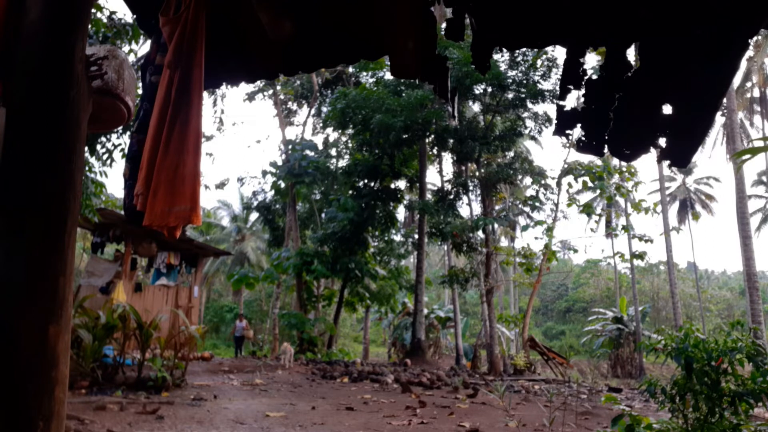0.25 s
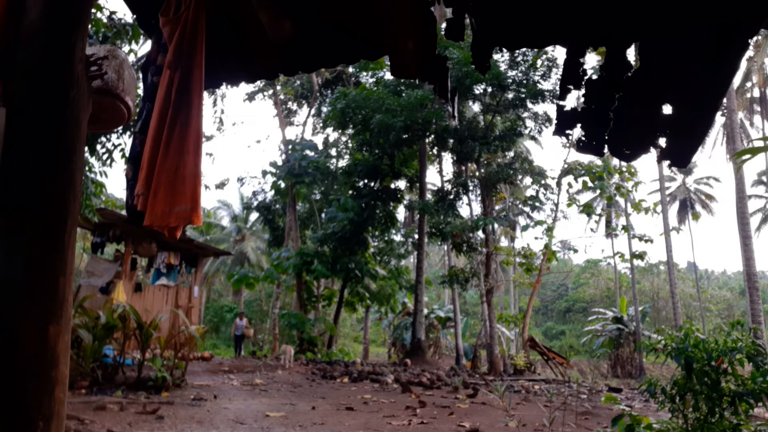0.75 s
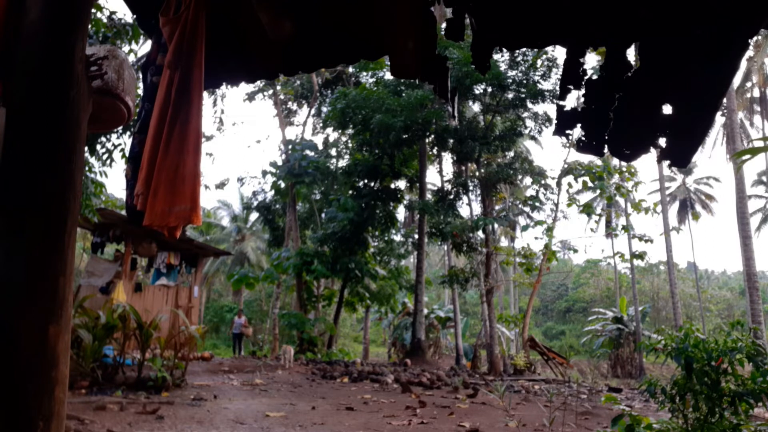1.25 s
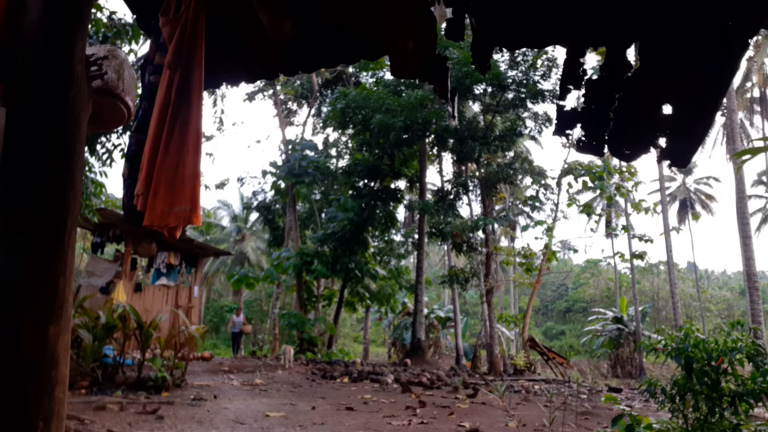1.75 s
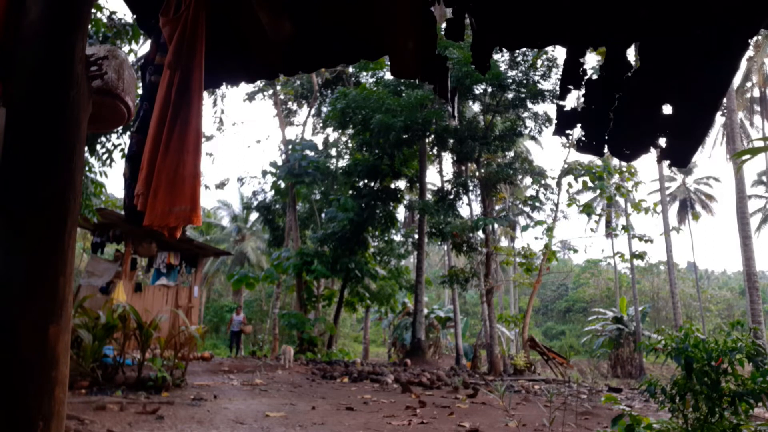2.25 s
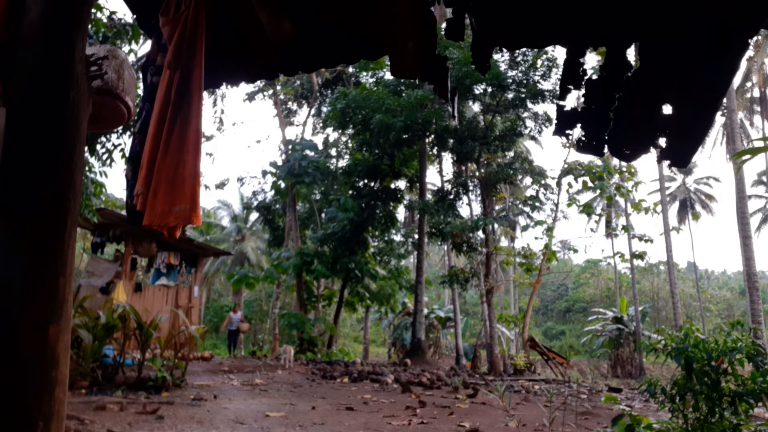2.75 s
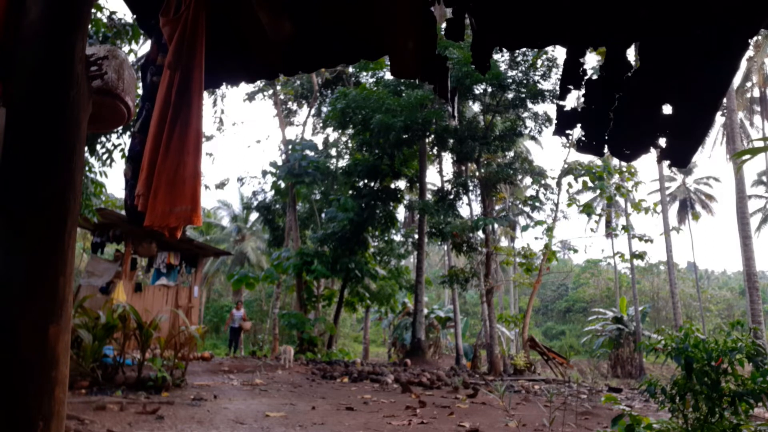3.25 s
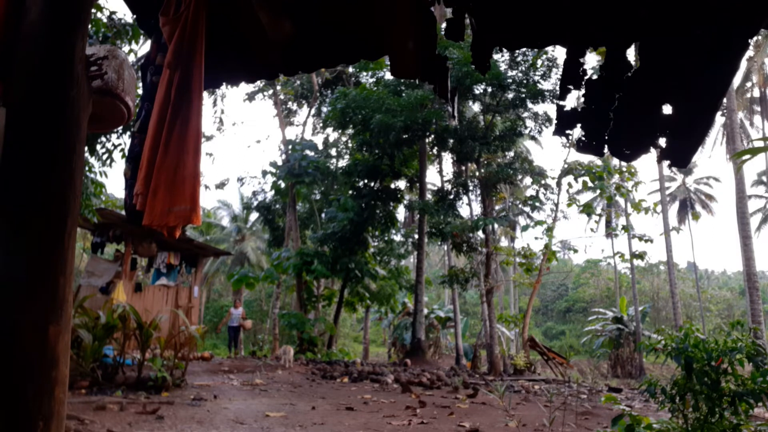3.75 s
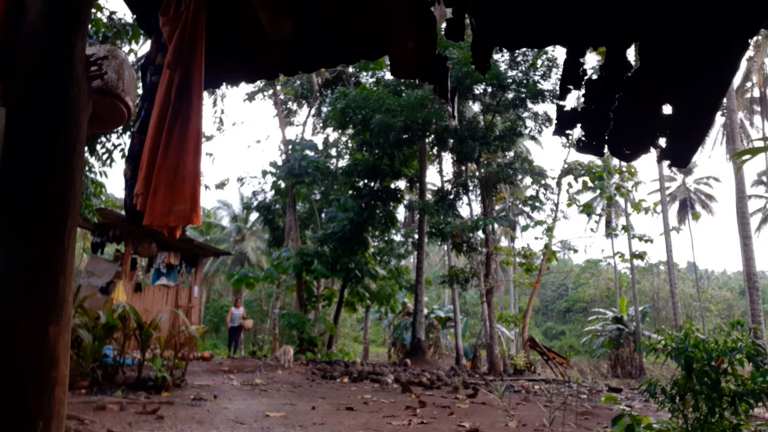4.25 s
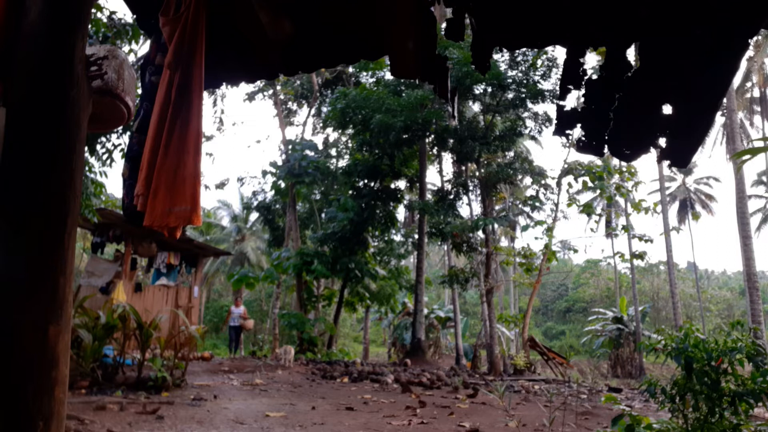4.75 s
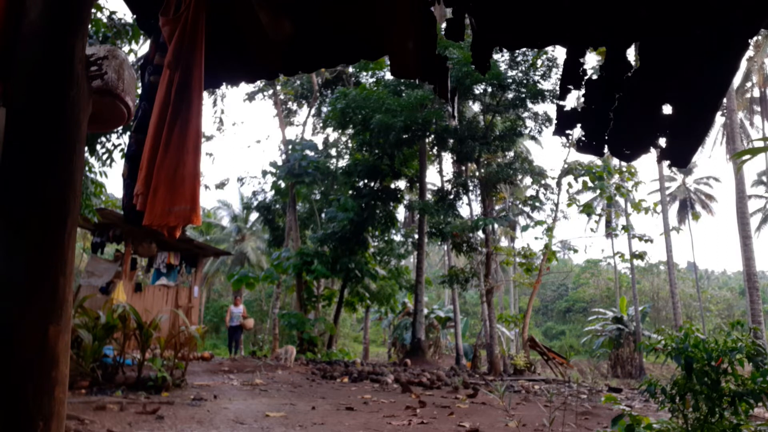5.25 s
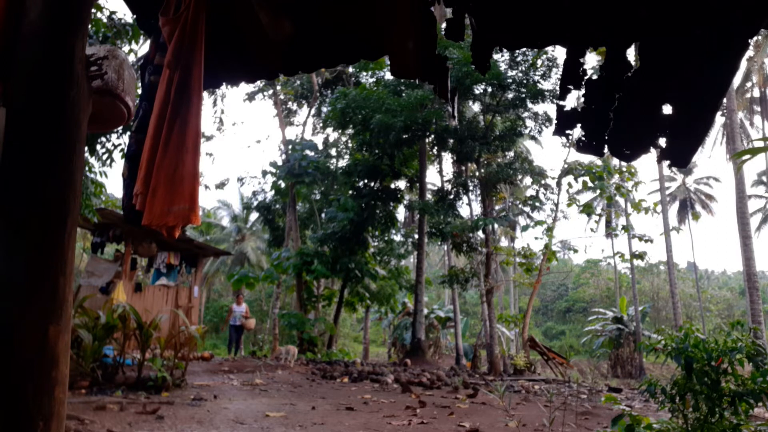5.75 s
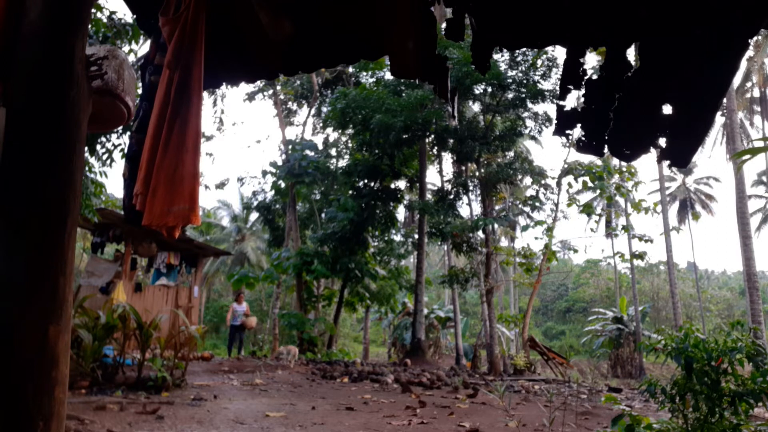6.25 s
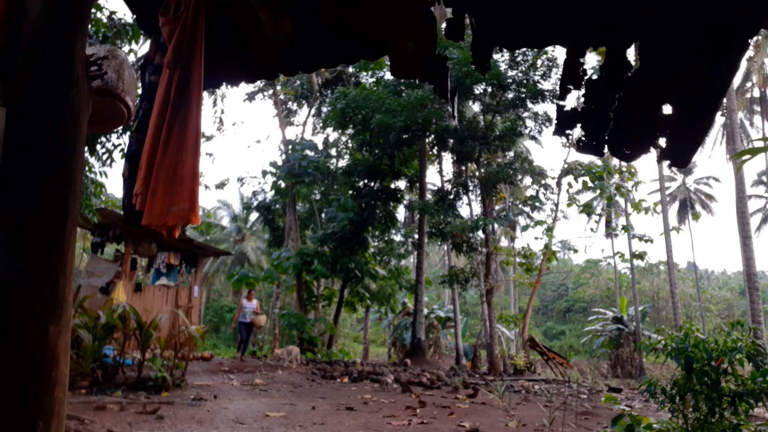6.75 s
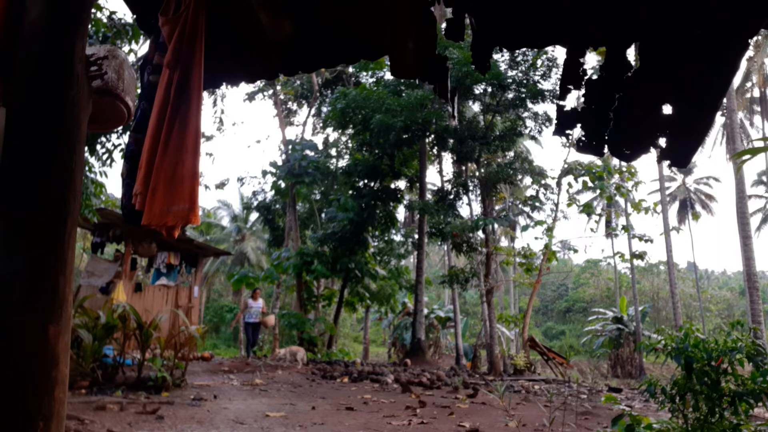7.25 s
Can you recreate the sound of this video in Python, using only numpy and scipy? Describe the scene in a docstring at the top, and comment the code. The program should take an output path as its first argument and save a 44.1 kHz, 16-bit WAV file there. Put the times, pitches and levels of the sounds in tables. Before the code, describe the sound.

In a quiet tree-lined farmyard, a hen clucks in a quick regular run and squawks once loudly, while birds whistle and trill farther off.

```python
"""Hen in a farmyard, from the porch

A stereo microphone under a porch roof, in a farmyard among trees. Close by, a hen clucks four or five
times a second (rough harmonics through throat resonances) and sets something hollow ringing; a few low
clucks lead to one loud squawk and a last cluck, and the ground is scuffed now and then. Further off, small
birds whistle, chip and trill (gliding sines), over coloured noise: low air, leaves, insect hiss, rustles."""
import sys
import numpy as np
from scipy import signal
from scipy.fft import rfft, irfft
from scipy.io import wavfile

SR = 44100
rng = np.random.default_rng(int(sys.argv[2]) if len(sys.argv) > 2 else 0)


def materialize(psi):
    """Save the field psi as 16-bit PCM at rate SR to the path in sys.argv[1].

    A 1-D psi becomes a single channel; in a 2-D psi each row is a channel.
    """
    bounded = np.clip(np.atleast_2d(psi).T, -1, 1)
    quanta = np.round(bounded * 32767).astype(np.int16)
    wavfile.write(sys.argv[1], SR, quanta)


N = 330750
TIME = np.arange(N) / SR


def from_db(db):
    """Amplitude factor of a level in dB."""
    return 10 ** (np.asarray(db) / 20)


def rms_one(x):
    """The same signal scaled to rms 1."""
    return x / np.sqrt(np.mean(x ** 2) + 1e-20)


def columns(rows, at):
    """Every column of a table after the first, joined by straight lines."""
    first, *rest = np.transpose(rows)
    return [np.interp(at, first, column) for column in rest]


def at_hz(points, hz):
    """A spectrum read on a log-frequency axis."""
    point_hz, values = np.array(points).T[:2]
    return np.interp(np.log(hz + 1), np.log(point_hz), values)


def wobble(rate_hz):
    """Random motion up to about the given rate; rms 1."""
    lowpass = signal.butter(2, rate_hz, fs=SR, output="sos")
    return rms_one(signal.sosfilt(lowpass, rng.standard_normal(N)))


def delayed(x, ms):
    """The same sound a little later."""
    return np.interp(TIME - ms / 1000, TIME, x, 0)


def pan(x, left_db):
    """Level difference between the two sides."""
    return x * from_db([[left_db / 2], [-left_db / 2]])


def place(x, lead_ms, left_db):
    """A source off to one side: a positive lead reaches the left microphone first."""
    return pan(np.array([x, delayed(x, lead_ms)]), left_db)


# how alike diffuse sound is at the two microphones: f/Hz, left-right correlation
LIKENESS = [(60, 0.98), (250, 0.92), (600, 0.67), (1200, 0), (15000, 0.0061)]


def diffuse(spectrum):
    """Stereo noise of a given colour from all round, most alike on both sides in the bass; rms 1."""
    hz = np.arange(N // 2 + 1) * SR / N
    mid, side = rfft(rng.standard_normal((2, N))) * from_db(at_hz(spectrum, hz))
    alike = np.clip(at_hz(LIKENESS, hz), -1, 1)
    spectra = np.sqrt(1 + alike) * mid + np.sqrt(1 - alike) * side * [[1], [-1]]
    return rms_one(irfft(spectra, N))


# single reflections from roof and walls: delay t/ms, level/dB, left lead t/ms
ECHOES = [(7.107, -26, 0.49), (11.44, -16.5, -0.51), (23.97, -8.5, 0.33), (62, -18.5, -.2)]


def yard(x, near_db, near_t60, far_db, far_t60):
    """Reflections from roof and walls, a quick scatter, then a faint long echo from the trees."""
    t = TIME[:SR]
    tail = 0
    for level_db, t60 in ((near_db, near_t60), (far_db, far_t60)):
        scatter = rng.standard_normal((2, SR)) * from_db(-60 * t / t60) * (t > .012)
        tail = tail + from_db(level_db) * scatter / np.sqrt(np.sum(scatter ** 2) / 2)
    echoes = sum(from_db(db) * place(delayed(x, ms), lead, 0) for ms, db, lead in ECHOES)
    return echoes + signal.fftconvolve(x[None], tail, axes=1)[:, :N]


# colours of low air, leaves, insect hiss and dry rustles: f/Hz, relative level/dB per Hz
AIR = [(25, -39), (50, -6), (75, 0.5), (130, -3), (200, -6), (300, -12.5), (550, -20.5), (1200, -39),
       (4000, -70)]
LEAVES = [(100, -20), (350, -4), (550, 0.5), (830, -0.5), (1250, -4.5), (1600, -3), (2400, -4.5),
          (3250, -2), (4100, -7), (5500, -10.5), (7200, -59)]
HISS = [(4500, -24.5), (5600, -11), (6300, -8.5), (7000, 2), (7600, 1.5), (8100, -9), (8650, -31),
        (9200, -13.5), (10300, -1.5), (11200, -12.5), (12000, -26), (15500, -20)]
RUSTLE_COLOUR = [(1500, -6), (5000, 5), (8000, 3), (8700, -20), (10000, 4), (15000, 1)]
# faint dry rustles: peak t/s, half length t/s (to 1/e), level/dB
RUSTLES = [(.28, 0.25, -59), (1.33, .04, -66), (3.16, 0.055, -66), (3.999, .14, -59.5), (5.441, 0.052, -55)]
AIR_DB, LEAVES_DB, HISS_DB = -55, -57, -55


def background():
    """Unsteady low air, a smooth wash of leaves, insect hiss and a few dry rustles."""
    air = from_db(AIR_DB + 1.07 * wobble(12)) * diffuse(AIR)
    leaves = from_db(LEAVES_DB) * diffuse(LEAVES)
    hiss = from_db(HISS_DB) * diffuse(HISS)
    swells = sum(from_db(db) * np.exp(-((TIME - s) / length) ** 2) for s, length, db in RUSTLES)
    rustles = swells * from_db(2.4 * wobble(90)) * diffuse(RUSTLE_COLOUR)
    return pan(air + leaves, left_db=-2.5) + pan(hiss + rustles, left_db=-1.5)


def whistles(rows, contour, length, waver):
    """Nearly pure notes (t/s, f/Hz, level/dB) whose pitch and level all follow one contour."""
    out = np.zeros(N)
    unsteady = 1 + waver * wobble(180)
    for s, hz, db in rows:
        on = (TIME > s) & (TIME < s + length)
        bend, shape_db = columns(contour, (TIME[on] - s) / length)
        phase = 2 * np.pi * np.cumsum(hz * bend * unsteady[on]) / SR
        out[on] += from_db(db + shape_db) * np.sin(phase)
    return out


# trills: start t/s, length t/s, relative level/dB
TRILLS = [(0.39, 0.53, -50.5), (3.17, 0.58, -47), (4.565, 0.40, -47)]
TRILL_HZ, TRILL_SWEEPS_PER_S = 3335, 33   # mean values; pitch and pace both vary


def trills(sweep_hz, rise_s, fall_s, unevenness, overtone_db):
    """A whistle swept widely up and down some thirty times a second makes a purring trill."""
    out = np.zeros(N)
    pace = 1 + unevenness * wobble(29.3)
    reach = sweep_hz * (1 + 0.0573 * wobble(29.2))
    for s, length, db in TRILLS:
        on = (TIME > s) & (TIME < s + length)
        age = TIME[on] - s
        sweep = reach[on] * np.sin(2 * np.pi * np.cumsum(TRILL_SWEEPS_PER_S * pace[on]) / SR)
        phase = 2 * np.pi * np.cumsum(TRILL_HZ + sweep) / SR
        shape = from_db(db) * np.tanh(age / rise_s) * np.tanh((length - age) / fall_s)
        out[on] += shape * (np.sin(phase) + from_db(overtone_db) * np.sin(2 * phase))
    return out


# contours of the bird notes: share of the note, ratio to the note's pitch, relative level/dB
SLUR_CONTOUR = [(0, .99, -20), (.17, 1.005, -2), (.45, .99, -9), (.62, .95, -5), (.74, .8, -9),
                (.85, .72, -1), (1, .64, -12)]
CHIP_CONTOUR = [(0, .83, -16), (.2, .96, -3), (.35, 1, 6), (.52, .96, -1), (.66, .8, 0), (1, .79, -9)]
PEEP_CONTOUR = [(0, .97, -20), (.25, 1, 4), (.65, 1, 5), (1, 1.05, -10)]
DIP_CONTOUR = [(0, 1.12, -14), (.25, 1, 4), (.55, .93, 3), (.8, .98, 1), (1, 1.12, -12)]
# long falling whistles: start t/s, relative level/dB
SLURS = [(.275, -52.5), (.81, -50), (1.80, -56), (2.275, -49), (2.82, -47), (3.59, -50), (6.41, -52),
         (6.775, -50), (7.365, -53)]
# short arched notes: start t/s, top pitch f/Hz, relative level/dB
CHIPS = [(4.352, 3850, -51), (4.458, 3930, -50), (4.527, 4100, -52), (5.323, 3880, -49.5),
         (5.428, 3920, -48), (5.528, 4100, -47), (5.66, 4100, -45.5), (6.44, 3550, -59),
         (6.68, 3880, -57.5), (7.09, 3600, -61), (7.27, 3750, -57)]
# nearly level notes: start t/s, pitch f/Hz, relative level/dB
PEEPS = [(.095, 3320, -48.5), (.865, 3400, -53), (1.123, 3310, -48.5), (3.985, 3240, -59),
         (5.23, 3150, -62), (5.81, 3130, -59)]
# notes that dip and rise again: start t/s, pitch f/Hz, relative level/dB
DIPS = [(.66, 3180, -44.5), (4.56, 3900, -50), (6.565, 3300, -57)]
# every kind of note has its own length; slurs also keep their pitch
SLUR_S, SLUR_HZ, CHIP_S, PEEP_S, DIP_S = .2, 4540, .073, .075, .066


def birds():
    """Small birds further off, so their songs come blurred by the trees."""
    slurs = [(s, SLUR_HZ, db) for s, db in SLURS]
    song = whistles(slurs, SLUR_CONTOUR, SLUR_S, waver=0.0098)
    song = song + whistles(PEEPS, PEEP_CONTOUR, PEEP_S, waver=0.0068)
    song = song + whistles(CHIPS, CHIP_CONTOUR, CHIP_S, waver=0.0094)
    song = song + whistles(DIPS, DIP_CONTOUR, DIP_S, waver=0.0048)
    purr = trills(sweep_hz=615, rise_s=0.07, fall_s=0.012, unevenness=.12, overtone_db=-13)
    purr = from_db(2.3 * wobble(17)) * purr
    # the triller sits deep in the foliage: its sweeps arrive several times over and overlap
    song = song + from_db(-4) * (purr + delayed(purr, 9.3) + from_db(-6) * delayed(purr, 20.5))
    direct = place(song, lead_ms=0.062, left_db=-4.0)
    blur = yard(song, near_db=1, near_t60=0.082, far_db=-9.5, far_t60=0.34)
    return from_db(-2.5) * (direct + blur)


# scuffs on the ground: start t/s, relative level/dB, decay t/s (to 1/e), dull rumble's relative level/dB
SCUFFS = [(.745, -43, 0.058, -52), (2.655, -38, .035, -53.5), (3.699, -33, 0.039, -44.5)]
# colours of the grit and of the rumble: f/Hz, relative level/dB per Hz
SCUFF_COLOUR = [(59, -45), (100, -19.5), (345, -22.5), (570, -22), (923, -5), (1320, -12), (7510, -29.5),
                (8170, -28), (8700, -67), (9860, -31), (15000, -41)]
RUMBLE = [(40, -13), (110, -8), (260, 4), (500, -3.5), (1200, -5.5), (4000, -31)]


def scuffs(rise_s, rumble_s):
    """Short gritty bursts of noise, each leaving a dull rumble."""
    grit, rumble = 0, 0
    for s, db, decay, rumble_db in SCUFFS:
        age = np.maximum(TIME - s, 0)
        onset = 1 - np.exp(-age / rise_s)
        grit = grit + from_db(db) * onset * np.exp(-age / decay)
        rumble = rumble + from_db(rumble_db) * onset * np.exp(-age / rumble_s)
    crackle = from_db(3.9 * wobble(180))
    return grit * crackle * diffuse(SCUFF_COLOUR) + rumble * diffuse(RUMBLE)


# modes of a hollow thing near the hen: f/Hz, relative level/dB, t60 t/s
HOLLOW = [(966, 0, 0.4), (1640, 5, 0.66), (1970, -11, .4)]


def hollow(x):
    """Narrow resonant modes that go on ringing after each cluck."""
    out = 0
    for hz, db, t60 in HOLLOW:
        r = np.exp(-np.log(1000) / (t60 * SR))   # pole radius
        poles = [1, -2 * r * np.cos(2 * np.pi * hz / SR), r * r]
        out = out + from_db(db) * signal.lfilter([1 - r, 0, r - 1], poles, x)
    return out


def voice(pitch, rough, throat, jitter, tremble, flutter_hz, rasp, doubling, count=27):
    """Harmonics of an unsteady syrinx weighed by throat resonances; rms about 1."""
    def response(hz):
        return sum(from_db(db) / (1 + (2 * (hz - centre) / width) ** 2) for centre, width, db in throat)

    shake = wobble(flutter_hz)
    unsteady = 1 + (tremble + jitter * rough) * wobble(flutter_hz)[:len(pitch)]
    phase = 2 * np.pi * np.cumsum(pitch * unsteady) / SR
    out, power = 0, 0
    for k in np.arange(1, count, .5):
        # a hoarse voice alternates strong and weak cycles, which adds lines halfway between the harmonics
        gain = response(k * pitch) * (doubling * rough if k % 1 else 1)
        grit = rasp * rough * np.roll(shake, rng.integers(N))[:len(pitch)]
        angle = k * phase + k * k
        out = out + gain * (np.cos(angle) + grit * np.sin(angle))
        power = power + gain ** 2 * (1 + (rasp * rough) ** 2) / 2
    return out / np.sqrt(power)


def clucks(rows, throat, fall_s, arch, settle_s, jitter, rasp, doubling, flutter_hz, onset_s):
    """Each cluck bursts out hoarse, catches its pitch as it swells, and shuts off."""
    t = np.arange(-SR // 12, SR // 12) / SR   # time from the peak
    s, db, hz, swell, rough = np.array(rows).T[:, :, None]
    pitch = hz * (1 - arch * np.minimum((t / swell) ** 2, 3))
    hoarse = rough * (1 - .5 * np.tanh(t / settle_s))
    opening = .65 + .35 * np.tanh((t + .85 * swell) / onset_s)
    slope_s = np.where(t < 0, 1.8 * swell, fall_s)
    shape = from_db(db) * opening * np.exp(-np.abs(t / slope_s) ** 1.6)
    tone = voice(pitch.ravel(), hoarse.ravel(), throat, jitter, 0, flutter_hz, rasp, doubling, count=13)
    notes = shape * tone.reshape(pitch.shape)
    return sum(np.interp(TIME, at + t, note, 0, 0) for at, note in zip(s, notes))


# usual clucks: peak t/s, relative level/dB, swell scale t/s
CLUCKS = [(.020, -35.5, .034), (.225, -36, .013), (.439, -38, .013), (.662, -35.5, .012),
          (.878, -35.5, .018), (1.100, -36, .016), (1.320, -37, .015), (1.534, -35.5, .013),
          (1.753, -36, .016), (1.973, -36.5, .015), (2.215, -42, .029), (2.436, -35.5, .015),
          (2.64, -37, .016), (2.864, -35, .018), (3.094, -35.5, .014), (3.345, -38.5, .015),
          (3.967, -40.5, .017), (4.186, -38, .026), (4.411, -39.5, .013), (4.629, -40.5, .016),
          (4.854, -39, .014), (5.133, -37.5, .018), (5.589, -42.5, .017), (5.807, -38.5, .014)]
# effort is the energy of a cluck over that of a usual one; more of it makes the voice higher and clearer
USUAL_DB, USUAL_SWELL_S, USUAL_HZ, USUAL_ROUGH = -37, .015, 484, .55
RISE_HZ_PER_DB, CLEARING_PER_DB = 5, .035


def clucking():
    """Pitch and hoarseness of each cluck follow from its effort."""
    s, db, swell = np.transpose(CLUCKS)
    effort_db = db - USUAL_DB + 10 * np.log10(swell / USUAL_SWELL_S)
    hz = USUAL_HZ + RISE_HZ_PER_DB * effort_db
    rough = np.clip(USUAL_ROUGH - CLEARING_PER_DB * effort_db, 0, 1)
    return np.transpose([s, db, hz, swell, rough])


# low chesty clucks: peak t/s
LOW_CLUCKS = [5.124, 5.327, 5.651]
LOW_DB, LOW_SWELL_S, LOW_HZ, LOW_SAG_HZ_PER_S = -36.5, .016, 224, 36
LOW_ROUGH, LOW_ROUGHER_PER_S = .34, .5   # roughness 0-1


def grumbling():
    """The low clucks sink and roughen as they go on."""
    rows = []
    for s in LOW_CLUCKS:
        age = s - LOW_CLUCKS[0]
        hz = LOW_HZ - LOW_SAG_HZ_PER_S * age
        rows.append((s, LOW_DB, hz, LOW_SWELL_S, LOW_ROUGH + LOW_ROUGHER_PER_S * age))
    return rows


# fixed resonances of the open throat: f/Hz, width f/Hz, relative level/dB
SQUAWK_THROAT = [(539, 240, -23.5), (1205, 290, 4.5), (4620, 530, -20.5), (5700, 250, -14.5),
                 (7260, 910, -23.5), (9900, 2700, -30.5), (13500, 2500, -35)]
# resonances that move as the beak opens: t/s, lower f/Hz, its level/dB, upper f/Hz, its level/dB
BEAK = [(5.87, 1560, -4, 3250, -10.5), (5.925, 2030, 2, 3080, 1.5), (5.975, 1790, -2.5, 3300, -30),
        (6.03, 1780, 0.5, 3700, -16), (6.09, 1910, 1, 3620, -6.5), (6.135, 2210, 2, 3580, -16.5),
        (6.165, 2180, -15, 3570, -7)]
# pushes of effort lift pitch and level and roughen: t/s, half length t/s (to 1/e), rise f/Hz, rise level/dB
PUSHES = [(5.912, .034, 35, .8), (6.136, .03, 23, 2.5), (6.158, .011, 80, 3)]
# the squawk is one held note that scoops up from below and is hoarse while it catches
SQUAWK_START_S, SQUAWK_END_S, SQUAWK_ATTACK_S, SQUAWK_RELEASE_S = 5.868, 6.174, .011, .014
SQUAWK_DB, SQUAWK_HZ, SQUAWK_ROUGH = -28, 527, .04   # before scoop and pushes
SCOOP_HZ, SCOOP_S, SCOOP_ROUGH, ROUGH_PER_HZ = 45, .014, .8, .0042


def squawk():
    """One long call: harsh start, clear middle, and an upward break at the end."""
    t = np.arange(SQUAWK_START_S, SQUAWK_END_S, 1 / SR)
    age = t - SQUAWK_START_S
    lift_hz, lift_db = sum(np.outer([hz, db], np.exp(-((t - s) / length) ** 2))
                           for s, length, hz, db in PUSHES)
    scoop = np.exp(-age / SCOOP_S)
    pitch = SQUAWK_HZ + lift_hz - SCOOP_HZ * scoop
    rough = np.clip(SQUAWK_ROUGH + ROUGH_PER_HZ * lift_hz + SCOOP_ROUGH * scoop, 0, 1)
    shape = np.tanh(age / SQUAWK_ATTACK_S) * np.minimum((SQUAWK_END_S - t) / SQUAWK_RELEASE_S, 1)
    low_hz, low_db, high_hz, high_db = columns(BEAK, t)
    throat = SQUAWK_THROAT + [(low_hz, 480, low_db), (high_hz, 550, high_db)]
    tone = voice(pitch, rough, throat, jitter=0.049, tremble=0.0079, flutter_hz=129, rasp=1.0, doubling=0.083)
    return np.interp(TIME, t, from_db(SQUAWK_DB + lift_db) * shape * tone, 0, 0)


# throat resonances of usual and of low clucks: f/Hz, width f/Hz, relative level/dB
CLUCK_THROAT = [(506, 110, -4.5), (998, 300, 5.5), (1227, 147, 0.5), (1510, 120, -4), (1910, 210, -11.5),
                (3260, 1120, -12.5)]
CHEST_THROAT = [(356, 230, -8.5), (603.4, 230, 2), (800, 184, -5), (1632, 1150, -13), (3328, 830, -27)]
# the cluck after the squawk, from the same open throat:
# peak t/s, relative level/dB, pitch f/Hz, swell scale t/s, roughness 0-1
LAST_CLUCK = [(6.343, -27.5, 583.4, .012, 0.38)]


def hens():
    """Clucks and squawk from beside the porch, with the yard answering."""
    hen = clucks(clucking(), CLUCK_THROAT, fall_s=0.016, arch=.015, settle_s=0.025, jitter=0.0597,
                 rasp=0.96, doubling=0.85, flutter_hz=157.6, onset_s=0.0076)
    low = clucks(grumbling(), CHEST_THROAT, fall_s=0.012, arch=.06, settle_s=0.015, jitter=0.124,
                 rasp=0.84, doubling=0.26, flutter_hz=119, onset_s=0.014)
    last = clucks(LAST_CLUCK, SQUAWK_THROAT, fall_s=0.014, arch=.04, settle_s=0.018, jitter=0.086,
                  rasp=1.44, doubling=0.62, flutter_hz=149, onset_s=0.0098)
    loud = squawk() + last
    direct = place(hen + hollow(hen), lead_ms=.25, left_db=-5.5)
    direct = direct + place(low, lead_ms=0.38, left_db=-4.5)
    direct = direct + place(loud, lead_ms=0.269, left_db=-3)
    answer = yard(hen + low + loud, near_db=-7.5, near_t60=0.27, far_db=-16.5, far_t60=0.97)
    return direct + pan(answer, left_db=-1.5)


def scene():
    """Air all round, birds in the trees, scuffs on the ground, a hen near the house."""
    ground = pan(scuffs(rise_s=0.014, rumble_s=0.15), left_db=-1.5)
    return background() + birds() + ground + hens()


CUTOFF_HZ = 15500


def record(dry):
    """The top is cut steeply, by an elliptic low-pass."""
    return signal.sosfilt(signal.ellip(10, .2, 70, CUTOFF_HZ, fs=SR, output="sos"), dry)


dry = scene()
out = record(dry)
materialize(out)
```